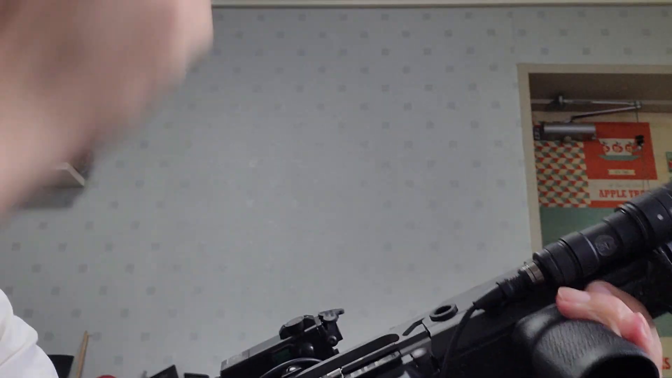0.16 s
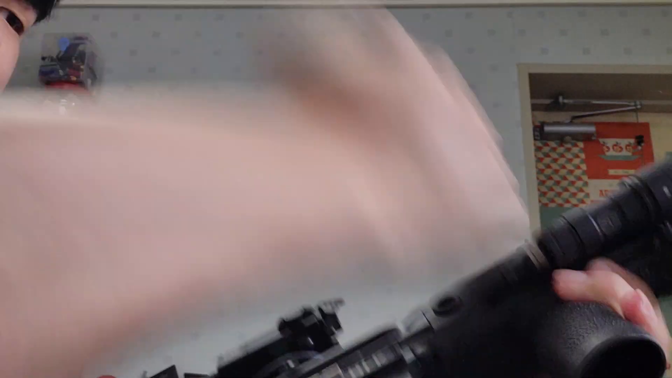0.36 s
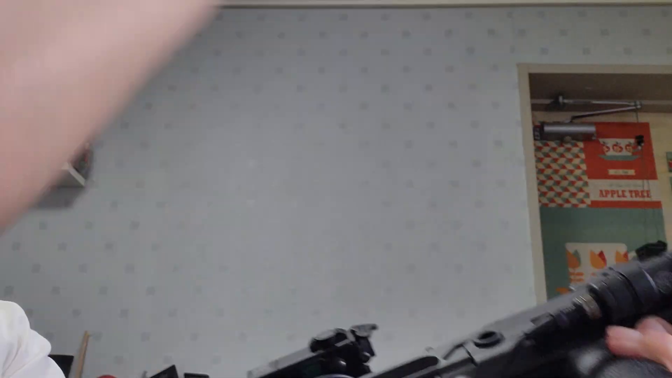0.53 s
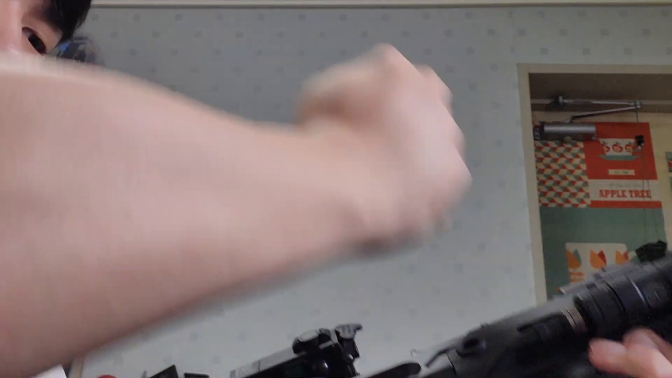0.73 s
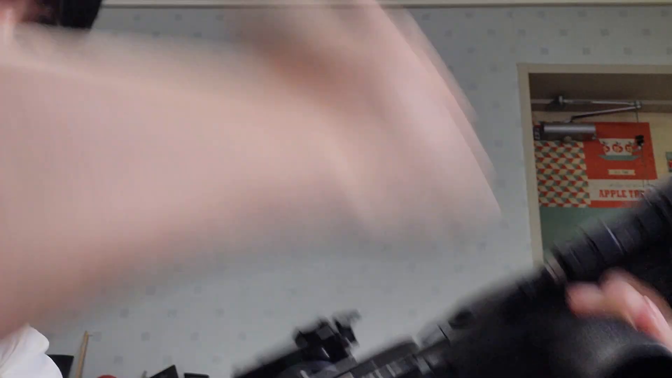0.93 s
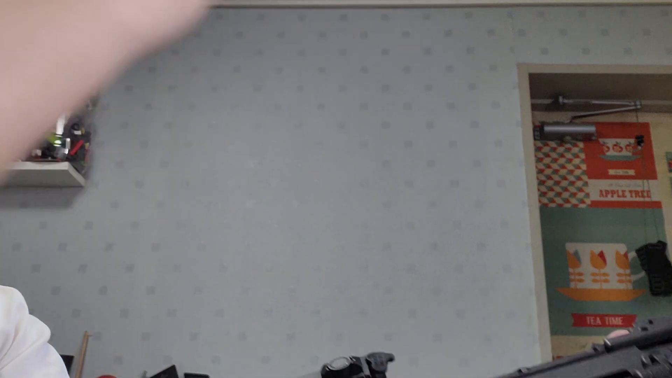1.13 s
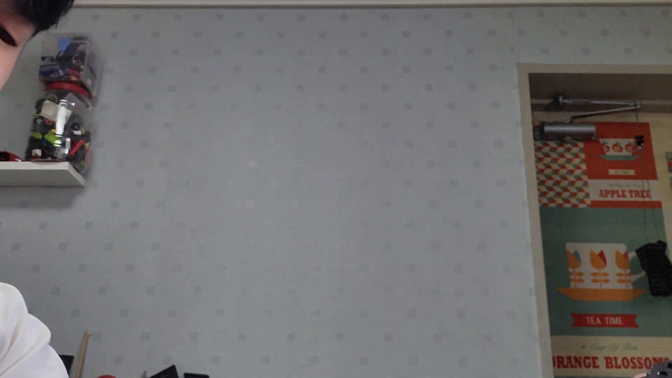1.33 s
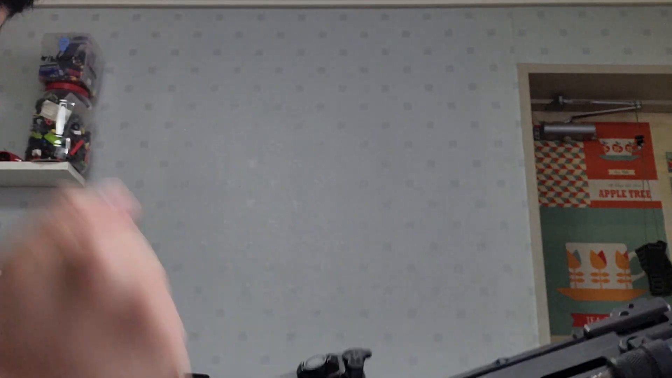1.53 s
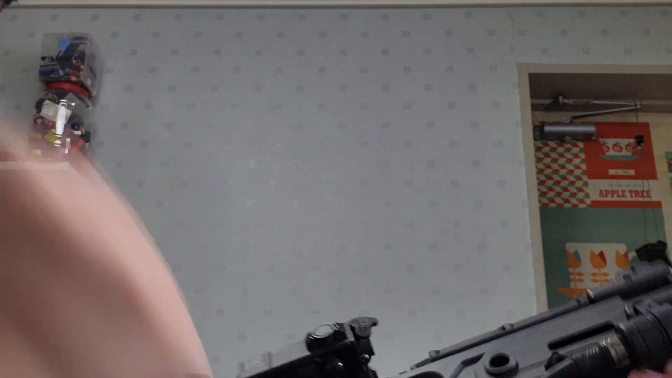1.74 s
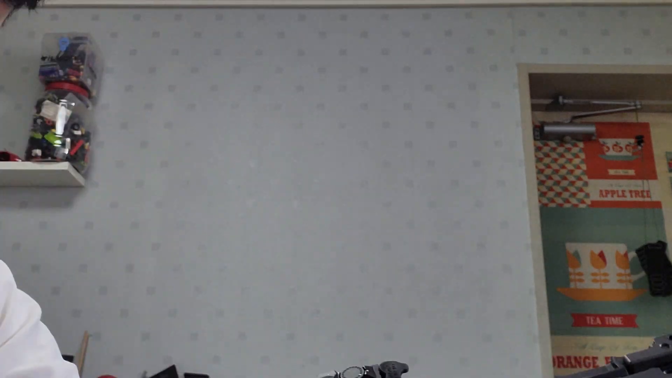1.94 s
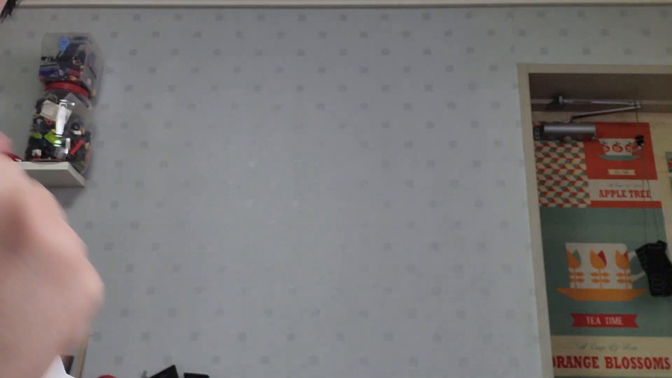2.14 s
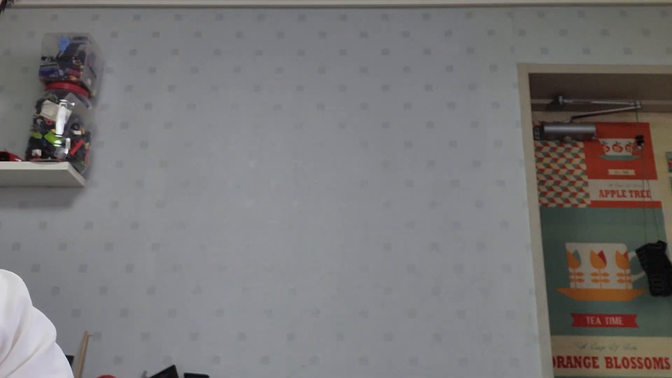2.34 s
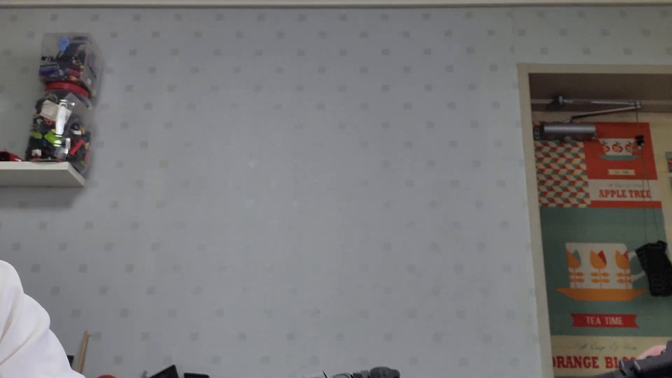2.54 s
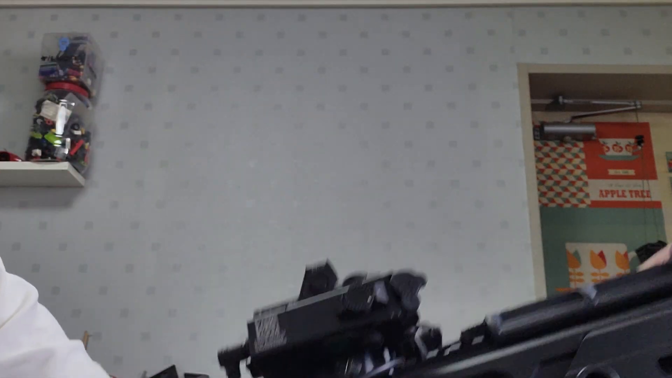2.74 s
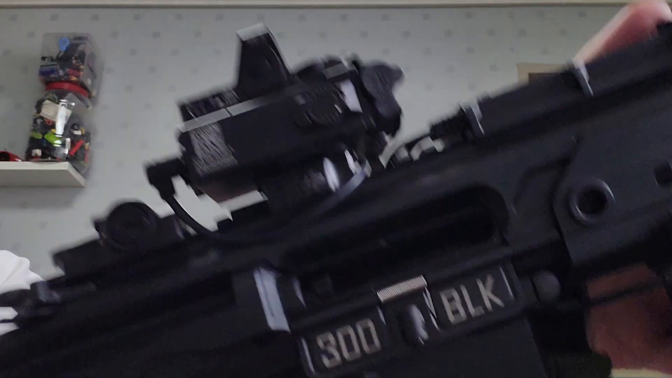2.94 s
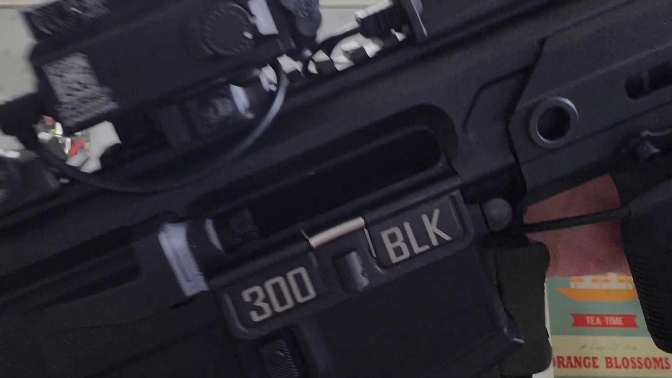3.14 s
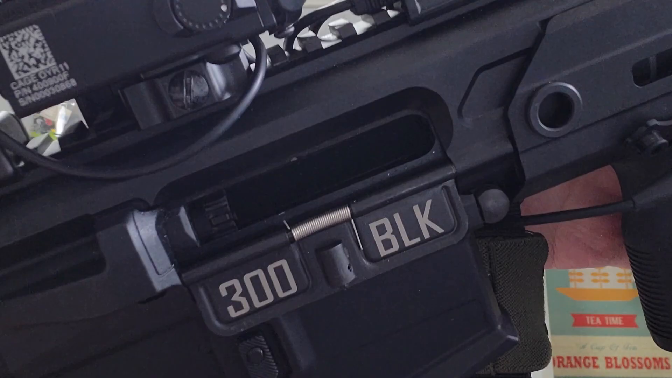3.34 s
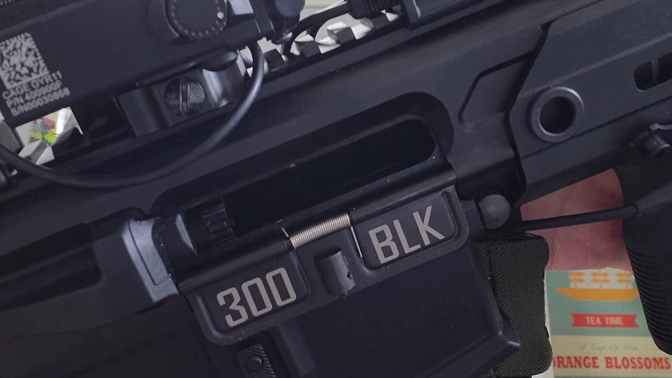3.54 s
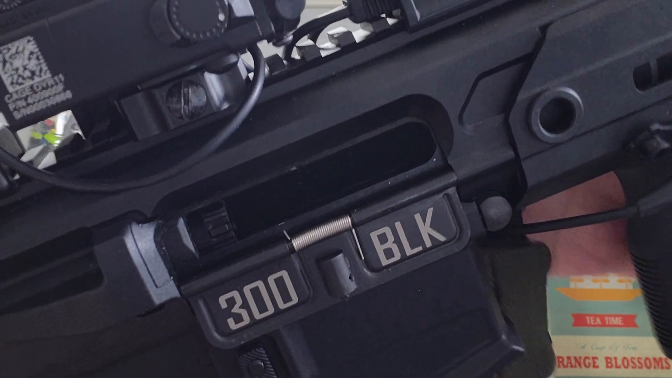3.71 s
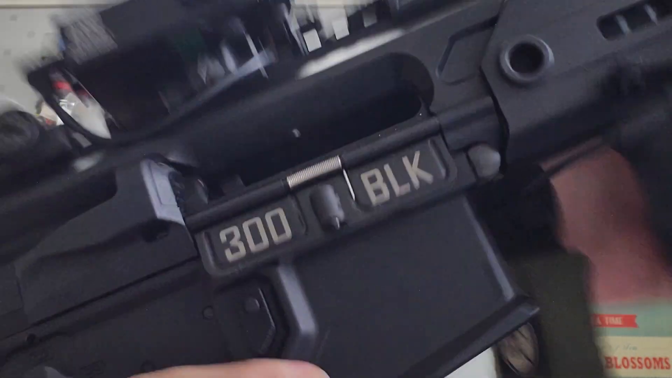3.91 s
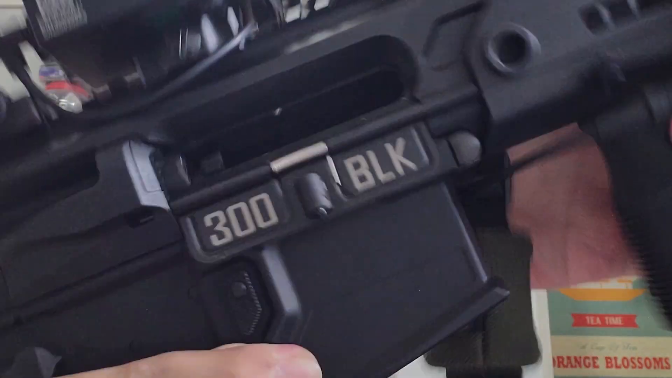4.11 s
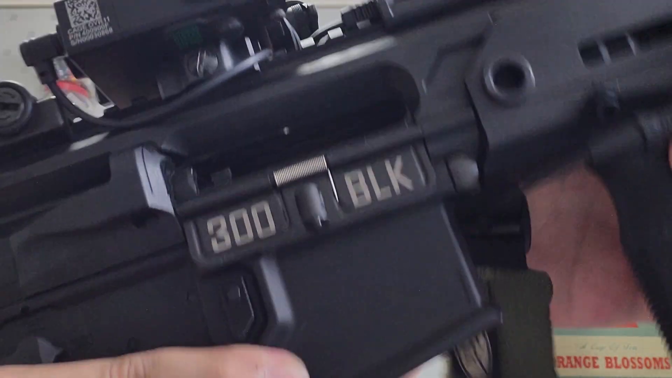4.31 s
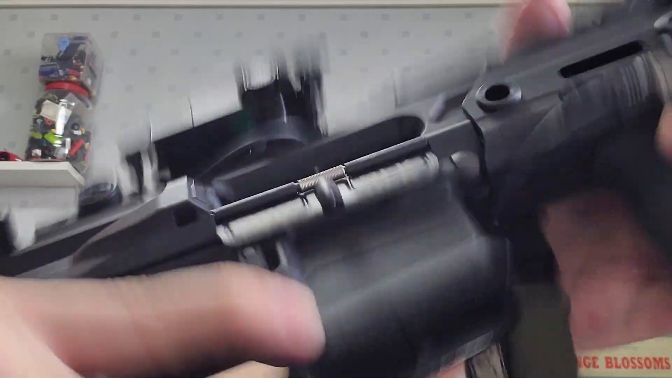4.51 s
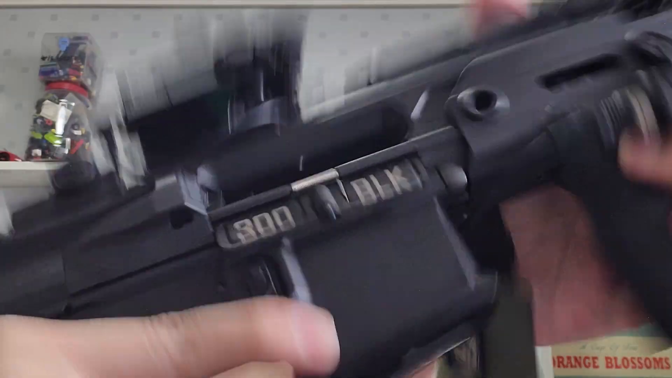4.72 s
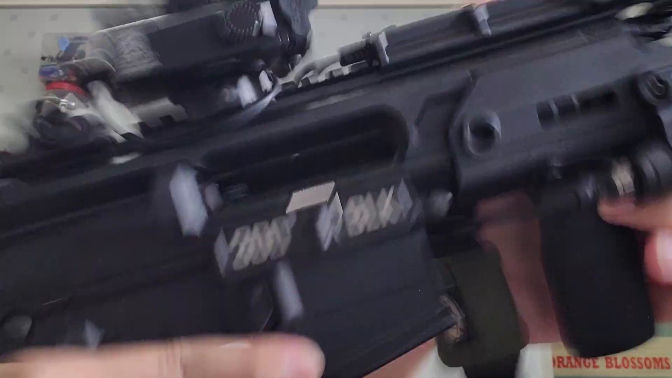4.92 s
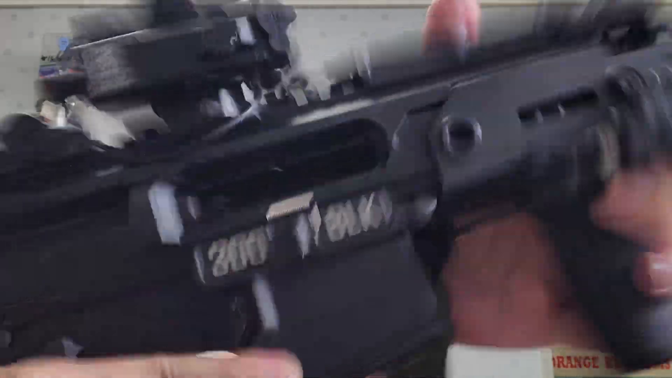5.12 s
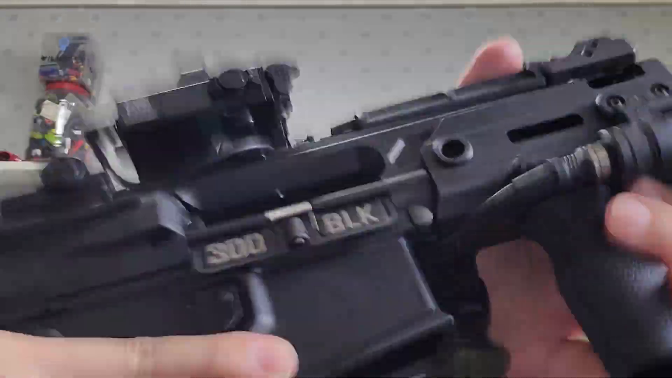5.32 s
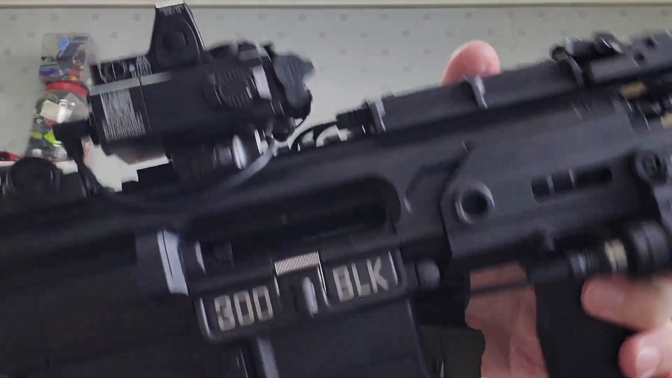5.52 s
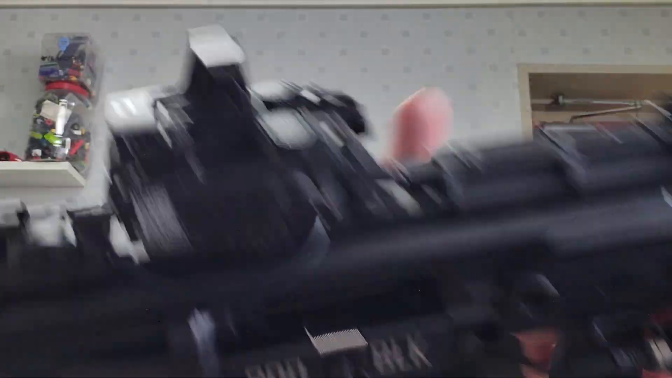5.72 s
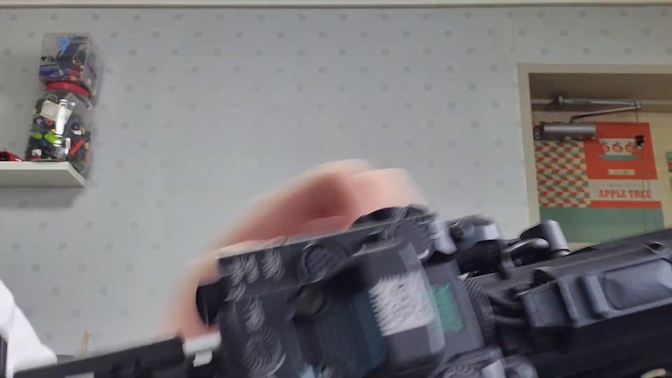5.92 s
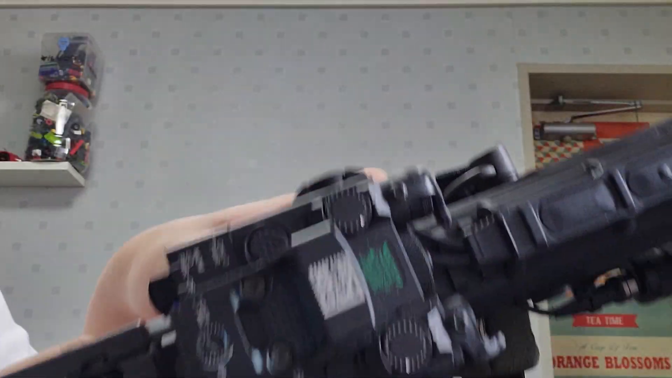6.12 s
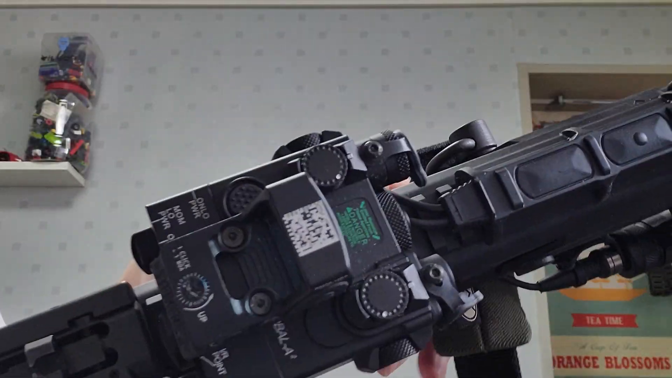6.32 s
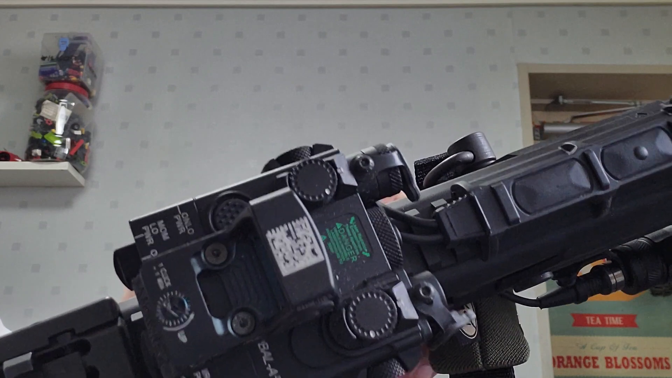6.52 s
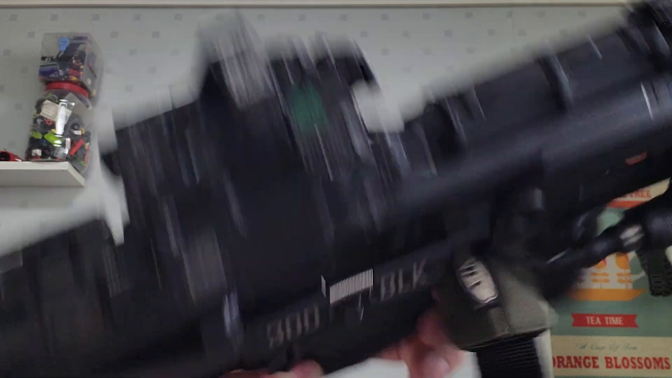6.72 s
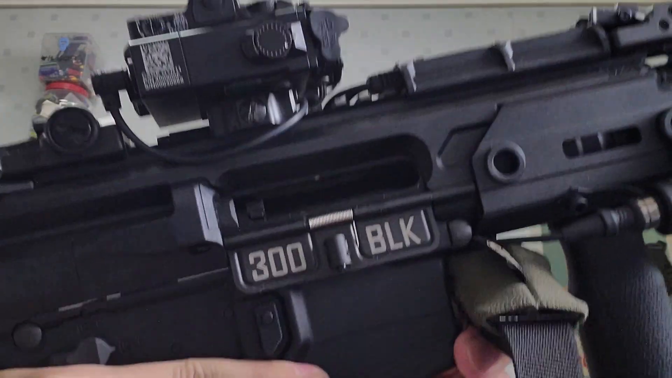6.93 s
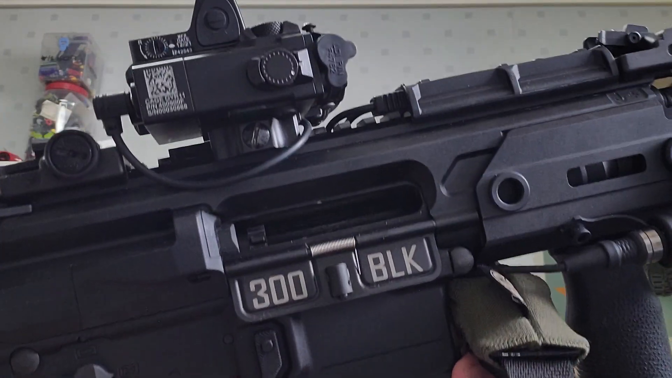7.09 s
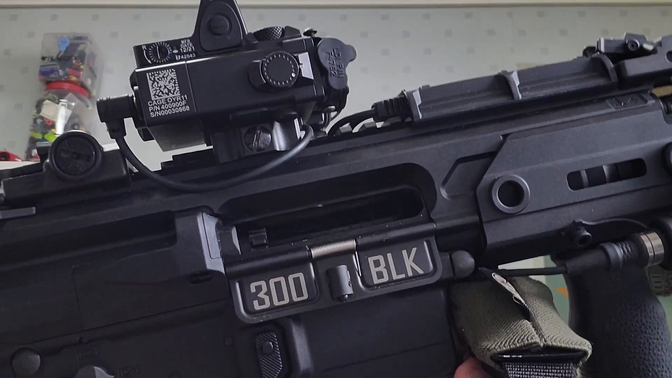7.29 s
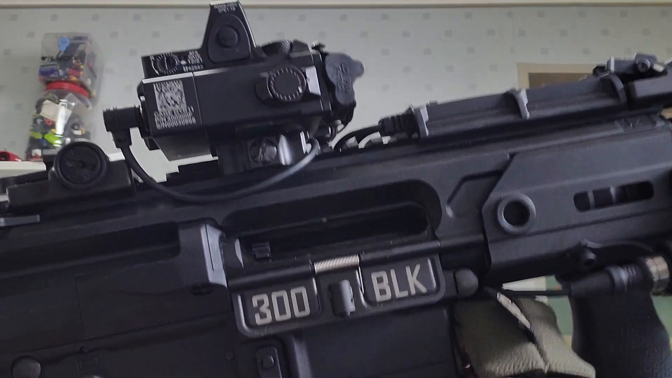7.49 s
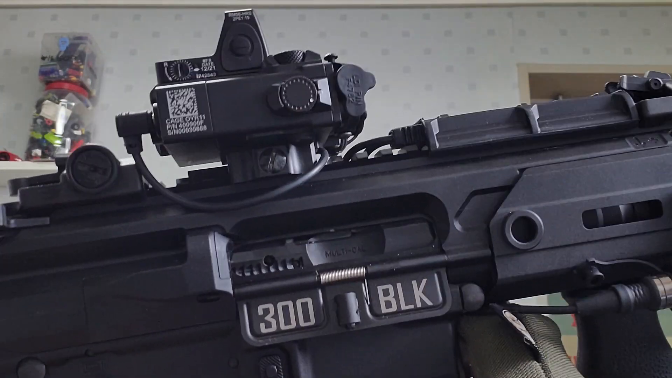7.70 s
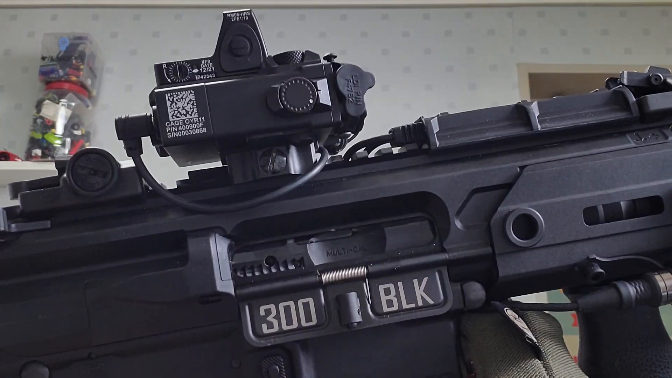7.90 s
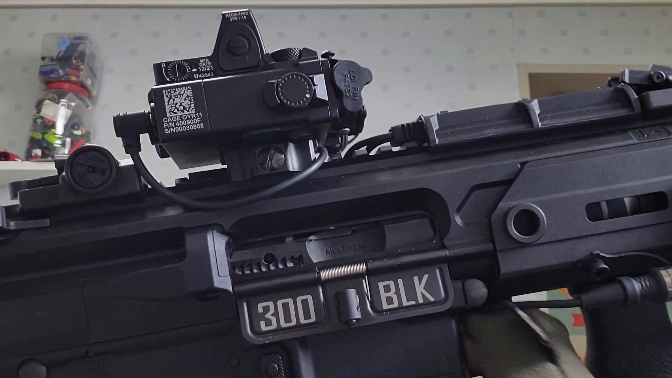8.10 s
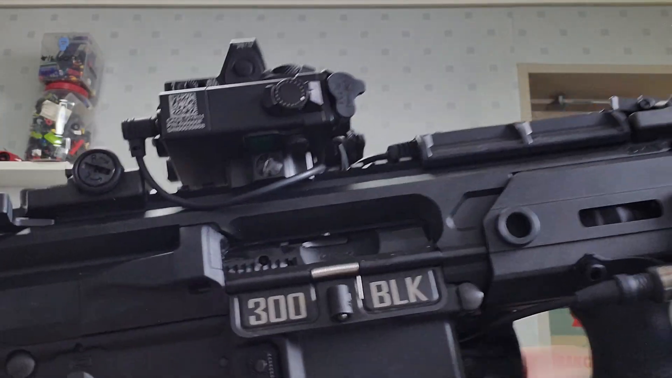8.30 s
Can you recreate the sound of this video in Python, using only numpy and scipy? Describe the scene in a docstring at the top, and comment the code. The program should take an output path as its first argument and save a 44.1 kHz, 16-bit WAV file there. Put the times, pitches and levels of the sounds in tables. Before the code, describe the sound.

Six clacking fist blows on an airsoft rifle, a spell of loose metal rattling, then a sharp bolt slam and a small lever click.

```python
"""Airsoft rifle handled in a small room

A gas blowback rifle, close by, bolt locked open. Six fist blows make its loose metal parts clack,
ring the receiver and shake the recoil spring. It is shaken so that it rattles, then turned over.
The bolt is released, slides forward and slams home; a lever clicks. Faint hum and hiss lie beneath.
Contacts are coloured noise bursts with a room tail; clear steel modes are decaying sines."""
import sys
import numpy as np
from scipy import signal
from scipy.fft import irfft, next_fast_len
from scipy.io import wavfile

SR = 44100
rng = np.random.default_rng(int(sys.argv[2]) if len(sys.argv) > 2 else 0)


def digitize_waveform(pressure):
    """Quantize a signal to 16-bit integers and store it at the path in sys.argv[1].

    Rows of a 2-D input are taken as channels; values are limited to [-1, 1].
    """
    field = np.atleast_2d(pressure).T
    bounded = np.clip(field, -1, 1)
    quanta = np.round(bounded * 32767).astype(np.int16)
    wavfile.write(sys.argv[1], SR, quanta)


N = 368235
HIT_SAMPLES = 12288   # one hit and its tail
ROOM_T60_S, ROOM_BUILD_S, LEFT_MIC_LAG_S = 0.18, 0.007, 0.00022
GRIP_SHIFT_S, SHAKE_START_S, SHAKE_END_S = 3.97, 4.6, 5.43
CATCH_S, RELEASE_S, CHAMBER_S, SLAM_S = 7.533, 7.555, 7.582, 7.5925
FOLLOW_S = 0.0022   # gap within a double contact

# two spaced microphones, lag aside: (frequency [Hz], left-right coherence [0..1])
MIC_COHERENCE = [(40, 0.96), (150, 0.94), (700, 0.65), (1300, 0.65), (2300, 0.36), (3500, 0.15),
                 (16000, 0.033)]
# room tone envelopes: (time [s], level [dB])
HUM_LEVELS = [(0, -64), (3.5, -68), (4.2, -55.5), (5.1, -49), (5.5, -59), (6.4, -63.5), (7.55, -62.5),
              (7.7, -81), (8.35, -85)]
HISS_LEVELS = [(0, -95), (5.6, -84), (6.1, -69), (6.7, -68), (7.5, -73.5), (7.8, -86.5), (8.35, -97.5)]
# wavering tones in the hiss: (frequency [Hz], level re hiss [dB])
WHINE_TONES = [(362, -1.5), (403, -3.5), (462, 1), (2745, -9.5)]

# noise spectrum of each source: (frequency [Hz], relative density [dB])
HUM_SPECTRUM = [(15, -37.5), (25, -18), (54, 0.5), (91, -7), (120, 5.5), (198, -7.5), (235, -2), (297, -8),
                (364, -4.5), (476, -8), (645, -13.5), (934, -14.5), (1400, -23), (1900, -30), (3080, -46.5)]
HISS_SPECTRUM = [(1600, -18), (2100, 1.5), (2400, -3.5), (2750, 0), (3000, -19), (4000, -27.5)]
RUSTLE_SPECTRUM = [(1060, -37.5), (1800, -2.5), (3840, -3), (7090, -2.5), (8670, -6), (9420, -3),
                   (14900, -6), (16000, -7)]
JOSTLE_SPECTRUM = [(35, -5), (65, 4), (130, -7.5), (280, -8), (600, 0), (1300, -3.5), (2000, -3),
                   (4000, -17)]
BOOM_SPECTRUM = [(25, -13), (50, 1), (90, -10.5), (125, 1), (200, -8), (300, -15.5), (600, -33)]
SPRING_SPECTRUM = [(2100, -15.5), (2300, -1.5), (2470, 3.5), (2650, -2.5), (2850, -11.5)]
LEVER_SPECTRUM = [(180, -60), (300, -39), (555, -15.5), (1040, -22.5), (3460, -13), (4520, -14),
                  (5340, -9.5), (8360, -19.5), (9240, -4), (10600, -26), (16000, -31)]
KNOCK_SPECTRUM = [(150, -21.5), (250, -12.5), (597, 1), (988, -8), (1120, -0.5), (1330, 2), (1910, -6.5),
                  (2160, -1.5), (2910, -9.5), (4120, -12.5), (4490, -10.5), (7980, -20), (8850, -28.5),
                  (9660, -22.5), (16000, -39)]
RATTLE_SPECTRUM = [(88, -37), (150, 1), (448, -10), (745, 0), (1020, -6), (1240, 2.5), (2060, -4.5),
                   (7180, 0), (8560, -10.5), (9440, -4), (11700, -8), (14800, -15.5), (16000, -16)]
BOLT_SPECTRUM = [(88, -51.5), (150, -38.5), (545, -13), (649, -22), (805, -4), (998, -11), (1720, -6.5),
                 (2180, -8), (2550, -7.5), (7620, -0.5), (8560, -7), (9630, 1.5), (10400, -3.5),
                 (14500, -6), (16000, -18)]
CLACK_SPECTRUM = [(150, -39.5), (250, -18), (407, -18.5), (528, -11.5), (674, -14.5), (735, -8), (1700, -8),
                  (2530, -4), (2910, -4.5), (3980, -4.5), (6140, -3), (9010, -1), (10500, -5), (13400, -1),
                  (16000, -10)]

# modes of the metal parts: (frequency [Hz], level re strike [dB], t60 [s])
LEVER_RING = [(552, -51, 0.056), (5160, -59, 0.19), (9100, -32.5, 0.057), (9560, -42, 0.065)]
SPRING_RING = [(2433, -21, 0.1), (2430, -26, 0.082), (5230, -33, .2), (7250, -31, .08)]
BOLT_RING = [(6826, -18, .1), (9494, 0, .11), (11236, -1, .12), (14127, -9, .1)]
RECEIVER_RING = [(1197, -40.5, .12), (2400, -32, .16), (2624, -33.5, .16), (5170, -35, 0.12),
                 (7260, -30.5, 0.115), (9300, -32, .14), (13400, -34.5, .16)]

# hand or sleeve sliding over the rifle: (peak time [s], level [dB], length [s])
HAND_RUBS = [(0.074, -65.5, .1), (.33, -71.5, .25), (0.684, -72, 0.13), (0.867, -61, .15),
             (1.174, -58, .08), (1.39, -79, .1), (1.96, -70.5, .2), (2.298, -79.5, .25), (2.812, -63, .25),
             (3.104, -77.5, 0.23), (3.643, -84, .3), (3.875, -67.5, .1), (6.847, -59.5, .13)]
# vigour of shaking and turning: (time [s], rustle [dB], jostle [dB])
SHAKE_LEVELS = [(3.9, -72, -82), (4.22, -53, -54), (4.42, -76, -66), (4.55, -61, -75), (4.61, -45, -36.5),
                (4.77, -40, -52.5), (4.82, -37.5, -36.5), (5.03, -33, -42), (5.18, -40, -47),
                (5.33, -36.5, -40), (5.44, -45.5, -54), (5.56, -61, -61.5), (5.63, -56.5, -59.5),
                (5.8, -57, -58.5), (5.97, -70, -67), (6.27, -70, -68), (6.4, -90, -72), (7.5, -87.5, -75),
                (7.9, -89.5, -97.5)]
# hollow knocks of stock and receiver: (time [s], level [dB], t60 [s], centre [Hz])
BODY_CLUNKS = [(2.801, -50, 0.08, 652), (4.797, -36, .05, 1250), (4.81, -20.5, 0.063, 1240),
               (5.992, -54, 0.035, 1340), (6.072, -32, 0.035, 2180), (6.073, -34.5, 0.048, 1290),
               (6.77, -39, 0.079, 2050), (7.62, -20.5, 0.034, 779)]
# lever leaving one detent, entering the next:
# (time [s], relative level [dB], t60 [s], tilt [dB/oct], left-right [dB])
LEVER_CLICKS = [(8.1987, -48, 0.017, 2, 0.5), (8.2731, -31, 0.026, 1, -2.5)]
# dull grip knocks; hardest clacks of the shaking: (time [s], relative level [dB], tilt [dB/oct])
GRIP_KNOCKS = [(.025, -32, 10.5), (.6146, -38, 7.5), (.9113, -42, 4.5), (2.8011, -44, 3.5),
               (2.8386, -44, 5.5), (3.0908, -59.5, -7.5), (3.9564, -52.5, -13), (3.9907, -43, 6.5),
               (4.0129, -33, -1), (4.0433, -34, 5), (4.062, -41, 9.5), (4.1346, -39, 2),
               (4.2163, -31, -0.5), (4.2793, -39, 16), (4.3906, -44.5, 4.5), (4.4574, -37.5, 7.5),
               (4.4836, -37.5, 8), (4.5205, -36.5, 3.5), (4.58, -30.5, -2), (5.5913, -39.5, 5.5),
               (5.8369, -37.5, 0), (5.992, -36.5, 0.5), (6.056, -41.5, -1), (6.0725, -33, 3),
               (6.264, -53, 2.5), (6.7699, -33, 3), (6.8473, -39.5, -0.5)]
SHAKE_CLACKS = [(4.177, -24.5, 4), (4.5876, -12, 6), (4.6254, -33.5, -14), (4.6511, -19, 2),
                (4.7336, -12, 9.5), (4.7466, -16.5, -3), (4.7957, -21, -3.5), (4.8137, -15.5, -3),
                (4.834, -10, 8), (4.8764, -17.5, 0), (4.9024, -13.5, 11), (4.974, -11.5, 4),
                (5.0015, -12.5, 5.5), (5.0452, -19.5, 4.5), (5.0661, -15.5, 9), (5.0856, -24.5, -3.5),
                (5.1126, -19, 3), (5.1202, -12.5, 1), (5.1314, -9, 3), (5.1484, -20, -3), (5.2212, -4.5, 9),
                (5.2637, -25.5, -11.5), (5.298, -16, 0.5), (5.3218, -17, 3.5), (5.3663, -16.5, 22),
                (5.3801, -20.5, 2), (5.4087, -25, 1), (5.4395, -23.5, -3)]
# fist blows: (time [s], relative clack level [dB], tilt [dB/oct], first touch re clack [dB],
# rebound delay [s], rebound re clack [dB], thud [dB], thud [Hz], spring [dB], body [dB], body [Hz])
FIST_BLOWS = [(0.4446, -7.5, -0.5, -6.5, .0107, -4, -26.5, 62, -25.5, -29, 340),
              (.734, -8, 0, -15, 0.012, -1.5, -29, 64.5, -21, -34, 350),
              (1.0156, -11, -.5, -21.5, .0107, 3, -30.5, 58.8, -27, -39.5, 338),
              (1.53, -7, 0, -8, 0.0082, -5, -29.5, 123, -34, -31.5, 600),
              (1.8024, -12.5, -0.5, -8.5, 0.01, 7.5, -28.5, 122, -31.5, -27.5, 685),
              (2.066, -9.5, 0, -14, 0.011, -0.5, -27.5, 123.5, -32, -29.5, 587)]


def from_db(db):
    """Decibels to gain."""
    return 10 ** (np.asarray(db) / 20)


def pan(left_right_db):
    """Stereo gains for a level difference."""
    return from_db([[left_right_db / 2], [-left_right_db / 2]])


def unit_rms(x):
    """Scale to unit power."""
    return x / np.sqrt(np.mean(x ** 2) + 1e-20)


def in_time(rows):
    """Each column of a time curve, per sample."""
    times_s, *columns = np.transpose(rows)
    return [np.interp(np.arange(N) / SR, times_s, column) for column in columns]


def at_hz(points, hz):
    """Read a table on a log-frequency axis."""
    points_hz, values = np.transpose(points)
    return np.interp(np.log(hz), np.log(points_hz), values)


def decay(t60_s):
    """Exponential decay over one hit."""
    return from_db(-60 * np.arange(HIT_SAMPLES) / SR / max(t60_s, 1e-3))


def add(out, time_s, sound):
    """Mix in one hit."""
    start = int(time_s * SR)
    out[:, start:start + HIT_SAMPLES] += sound[..., :N - start]


def noise(spectrum, size=HIT_SAMPLES, tilt_db_oct=0, ripple_db=0):
    """Unit-power noise at two microphones; falls 24 dB/oct beyond the spectrum's ends."""
    hz = np.maximum(np.fft.rfftfreq(size, 1 / SR), 1)
    outside_oct = np.abs(np.log2(hz / np.clip(hz, spectrum[0][0], spectrum[-1][0])))
    slope_db = tilt_db_oct * np.log2(np.clip(hz, 1300, 12000))
    gain = from_db(at_hz(spectrum, hz) + slope_db + ripple_db - 24 * outside_oct)
    coherence = at_hz(MIC_COHERENCE, hz)
    mid, side = np.exp(2j * np.pi * rng.random((2, len(hz))))
    left, right = gain * (np.sqrt(1 + coherence) * mid + np.sqrt(1 - coherence) * side * [[1], [-1]])
    return unit_rms(irfft([left * np.exp(-2j * np.pi * hz * LEFT_MIC_LAG_S), right], size))


def steady(spectrum):
    """Scene-long coloured noise."""
    return noise(spectrum, size=next_fast_len(N))[:, :N]


def room_tone(whine_width_hz=14):
    """Low hum and thin whining hiss; both sink after the slam."""
    hum = from_db(in_time(HUM_LEVELS)[0]) * steady(HUM_SPECTRUM)
    flat = steady([(200, 0.0025), (4000, 0.0032)])
    whine = 0
    for hz, db in WHINE_TONES:
        resonator = signal.iirpeak(hz, hz / whine_width_hz, fs=SR)
        whine += from_db(db) * unit_rms(signal.lfilter(*resonator, flat))
    return hum + from_db(in_time(HISS_LEVELS)[0]) * (steady(HISS_SPECTRUM) + whine)


def grains(rate_hz, spread_db, t60_s, smooth_share):
    """Unit-power envelope of tiny random contacts over smooth rubbing."""
    sizes = from_db(spread_db * np.minimum(rng.exponential(1, N), 3))
    impulses = sizes * (rng.random(N) < rate_hz / SR)
    power_pole = 10 ** (-6 / (t60_s * SR))
    power = signal.lfilter([1], [1, -power_pole], impulses ** 2 + 1e-18)
    return np.sqrt(smooth_share + (1 - smooth_share) * power / power.mean())


def handling(resting_db=-82, grainy_above_db=-56, rub_jostle_db=-6.5):
    """Cloth and skin rustle; hollow stock and handguard jostle lower down. Harder is grainier."""
    t = np.arange(N) / SR
    rubs = sum(from_db(db) / (1 + (2 * (t - peak_s) / length_s) ** 4)
               for peak_s, db, length_s in HAND_RUBS)
    shake, sway = from_db(in_time(SHAKE_LEVELS)) * (t > SHAKE_LEVELS[0][0])
    rubbing = shake + rubs + from_db(resting_db) * (t < RELEASE_S)
    smooth = 1 - 0.9 * rubbing / (rubbing + from_db(grainy_above_db))
    rustle = steady(RUSTLE_SPECTRUM) * grains(rate_hz=240, spread_db=5, t60_s=0.022, smooth_share=smooth)
    jostle = steady(JOSTLE_SPECTRUM) * grains(rate_hz=76, spread_db=8, t60_s=0.082, smooth_share=smooth)
    return rubbing * rustle + (sway + from_db(rub_jostle_db) * rubs) * jostle


def mode_ripple_db(spread_db, spacing_hz=239):
    """The strike point decides which groups of upper modes speak."""
    groups = rng.standard_normal(512)
    hz = np.fft.rfftfreq(HIT_SAMPLES, 1 / SR)
    depth_db = spread_db * np.minimum(hz / 1500, 1)
    return depth_db * np.interp(hz / spacing_hz, np.arange(len(groups)), groups)


def contacts(rows, spectrum, room_db, room_db_oct, trim_db, spread_db, snap_db):
    """Each contact snaps, rings dense modes briefly, then fills the room; rows as LEVER_CLICKS."""
    out = np.zeros((2, N))
    room = decay(ROOM_T60_S) * (1 - np.exp(-np.arange(HIT_SAMPLES) / SR / ROOM_BUILD_S))
    for time_s, db, t60_s, tilt_db_oct, pan_db in rows:
        ripple_db = mode_ripple_db(spread_db)
        envelope = decay(t60_s) + from_db(snap_db) * decay(t60_s / 4)
        crack = noise(spectrum, tilt_db_oct=tilt_db_oct, ripple_db=ripple_db) * envelope
        tail = noise(spectrum, tilt_db_oct=tilt_db_oct + room_db_oct, ripple_db=ripple_db) * room
        side = pan(np.clip(pan_db, -6, 6))
        wet = from_db(room_db) * np.sqrt(t60_s / ROOM_T60_S)   # longer cracks feed the room more
        add(out, time_s, from_db(db + trim_db) * (side * crack + wet * tail))
    return out


def ring(strikes, modes, spread_db=0):
    """Clear steel modes, random phase per microphone; strikes (time [s], level [dB])."""
    out, t = np.zeros((2, N)), np.arange(HIT_SAMPLES) / SR
    for time_s, db in strikes:
        for hz, mode_db, t60_s in modes:
            gain = from_db(db + mode_db + spread_db * rng.standard_normal())
            add(out, time_s, gain * decay(t60_s) * np.sin(2 * np.pi * (hz * t + rng.random((2, 1)))))
    return out


def thuds(rows, swing_t60_s=0.085, boom_db=-7, boom_t60_s=0.25, swell_s=0.049):
    """The rifle's mass swings, the room booms after it; rows (time [s], level [dB], pitch [Hz])."""
    out, t = np.zeros((2, N)), np.arange(HIT_SAMPLES) / SR
    for time_s, db, hz in rows:
        swing = np.sin(2 * np.pi * hz * t) * decay(swing_t60_s)
        boom = from_db(boom_db) * noise(BOOM_SPECTRUM) * decay(boom_t60_s) * (1 - decay(swell_s))
        add(out, time_s, from_db(db) * (swing + boom))
    return out * pan(left_right_db=-5.5)


def spring(rows, t60_s=0.14, swell_s=0.027):
    """The recoil spring's crowded modes swell and die as a narrow band; rows (time [s], level [dB])."""
    out = np.zeros((2, N))
    for time_s, db in rows:
        add(out, time_s, from_db(db) * noise(SPRING_SPECTRUM) * decay(t60_s) * (1 - decay(swell_s)))
    return out


def clunks(rows, flank_db=-16):
    """A knock wakes one broad resonance of the hollow body; rows as BODY_CLUNKS."""
    out = np.zeros((2, N))
    for time_s, db, t60_s, hz in rows:
        resonance = [(hz / np.sqrt(2), flank_db), (hz, 0), (hz * np.sqrt(2), flank_db)]
        add(out, time_s, from_db(db) * noise(resonance) * decay(t60_s))
    return out


def lever():
    """Two clicks; the lever rings as it drops into the detent."""
    clicks = contacts(LEVER_CLICKS, LEVER_SPECTRUM,
                      room_db=-10, room_db_oct=-4.5, trim_db=-0.5, spread_db=2, snap_db=-24)
    return clicks + ring([(LEVER_CLICKS[-1][0], 0)], LEVER_RING)


def light_touches(start_s, end_s, count, above_db, tilt_db_oct):
    """Lesser random contacts that follow the shaking's vigour; rows as SHAKE_CLACKS."""
    times_s = start_s + (end_s - start_s) * (np.arange(count) + rng.random(count)) / count
    jitter_db, jitter_db_oct = 3 * rng.standard_normal((count, 2)).T
    shake_s, vigour_db, _ = np.transpose(SHAKE_LEVELS)
    levels_db = np.interp(times_s, shake_s, vigour_db) + above_db + jitter_db
    return list(zip(times_s, levels_db, tilt_db_oct + jitter_db_oct))


def scattered(rows, untilted_t60_s, pan_db, pan_spread_db=4.5, halving_db_oct=25):
    """Parts meet all over the rifle: each contact has its own side; bright ones die sooner."""
    return [(time_s, db, untilted_t60_s * 2 ** (-tilt_db_oct / halving_db_oct), tilt_db_oct,
             pan_db + pan_spread_db * rng.standard_normal()) for time_s, db, tilt_db_oct in rows]


def loose_parts():
    """Metal rattles during the shaking; the body knocks as the grip shifts."""
    light_clacks = light_touches(SHAKE_START_S, SHAKE_END_S, count=26, above_db=9, tilt_db_oct=-1)
    clacks = scattered(SHAKE_CLACKS + light_clacks, untilted_t60_s=0.023, pan_db=-0.5)
    light_knocks = light_touches(GRIP_SHIFT_S, SHAKE_START_S, count=8, above_db=19, tilt_db_oct=6.5)
    knocks = scattered(GRIP_KNOCKS + light_knocks, untilted_t60_s=0.035, pan_db=-1.5)
    metal = contacts(clacks, RATTLE_SPECTRUM,
                     room_db=-9, room_db_oct=-3, trim_db=-3, spread_db=6, snap_db=-6.5)
    body = contacts(knocks, KNOCK_SPECTRUM,
                    room_db=-4.5, room_db_oct=-1.5, trim_db=0.5, spread_db=3.5, snap_db=-6.5)
    return metal + body


def bolt(short_t60_s=0.027, long_t60_s=0.031, bounce_s=0.009, pan_db=-2):
    """The bolt scrapes along its rails, hits the chamber twice, slams home and bounces."""
    hits = [(CATCH_S, -36.5, long_t60_s, -8, pan_db), (RELEASE_S, -10.5, short_t60_s, 0, pan_db)]
    scrapes_s = np.linspace(RELEASE_S, CHAMBER_S, 5)[1:-1]
    # rail contacts harden as the bolt gathers speed
    hits += [(time_s, -17.5 + 2 * k, long_t60_s, 0, pan_db) for k, time_s in enumerate(scrapes_s)]
    hits += [(time_s, -10.5, short_t60_s, 4, 0) for time_s in (CHAMBER_S, CHAMBER_S + FOLLOW_S)]
    hits += [(SLAM_S, -6, long_t60_s, 0, 0)]
    hits += [(SLAM_S + (k + 1) * bounce_s, -11.5 - 0.5 * k, long_t60_s, -1, pan_db) for k in range(3)]
    cracks = contacts(hits, BOLT_SPECTRUM,
                      room_db=-2.5, room_db_oct=-1.5, trim_db=-0.5, spread_db=5, snap_db=-19)
    steel = ring([(CHAMBER_S, -27), (SLAM_S, -16.5)], BOLT_RING)
    coils = ring([(RELEASE_S, 0)], SPRING_RING) + spring([(RELEASE_S, -16)])
    return cracks + steel + coils + thuds([(RELEASE_S, -32, 52)])


def fist_blows(touch_lead_s=0.003, spring_delay_s=0.022, ring_db=7, pan_db=-2):
    """Each blow clacks the loose parts, rings receiver and hollow body, thuds and shakes the spring."""
    touch_t60_s, clack_t60_s, body_t60_s = 0.011, 0.021, 0.11
    hits, jolts, swings, buzzes, hollows = [], [], [], [], []
    for (time_s, db, tilt_db_oct, touch_db, rebound_s, rebound_db,
         thud_db, thud_hz, spring_db, body_db, body_hz) in FIST_BLOWS:
        # light touch, double clack, two brighter rebounds
        hits += [(time_s - touch_lead_s, db + touch_db, touch_t60_s, tilt_db_oct - 0.5, 2 * pan_db),
                 (time_s, db, clack_t60_s, tilt_db_oct, pan_db),
                 (time_s + FOLLOW_S, db - 1, clack_t60_s, tilt_db_oct, pan_db),
                 (time_s + rebound_s, db + rebound_db, clack_t60_s, tilt_db_oct + 2, pan_db),
                 (time_s + 1.7 * rebound_s, db - 2, clack_t60_s, tilt_db_oct + 2, 0)]
        jolts.append((time_s + FOLLOW_S, db + ring_db))
        swings.append((time_s, thud_db, thud_hz))
        buzzes.append((time_s + spring_delay_s, spring_db))
        hollows.append((time_s, body_db, body_t60_s, body_hz))
    clacks = contacts(hits, CLACK_SPECTRUM,
                      room_db=-1.5, room_db_oct=-3.5, trim_db=-2, spread_db=3.5, snap_db=-19)
    receiver = ring(jolts, RECEIVER_RING, spread_db=5)
    return clacks + receiver + thuds(swings) + spring(buzzes) + clunks(hollows)


def scene():
    """Blows, shaking, bolt and lever over the room tone."""
    return fist_blows() + loose_parts() + clunks(BODY_CLUNKS) + bolt() + lever() + handling() + room_tone()


def record(dry):
    """Clip at full scale, then low-pass."""
    cutoff_hz = 15900
    lowpass = signal.ellip(10, 0.2, 70, cutoff_hz, fs=SR, output="sos")
    return signal.sosfilt(lowpass, np.clip(dry, -1, 1))


dry = scene()
out = record(dry)
digitize_waveform(out)
```